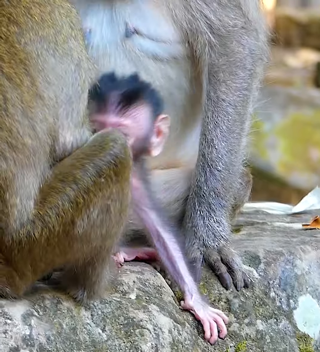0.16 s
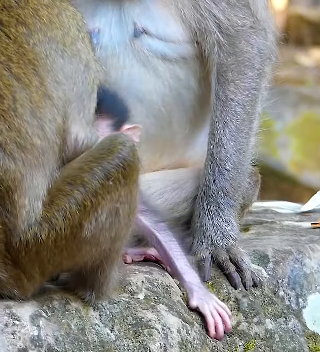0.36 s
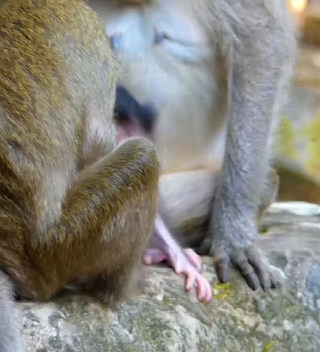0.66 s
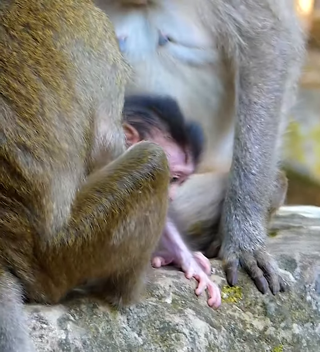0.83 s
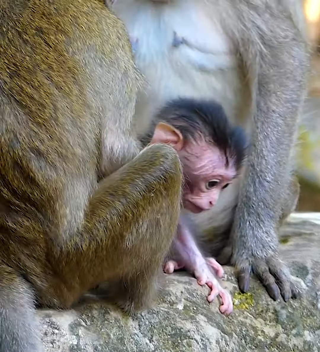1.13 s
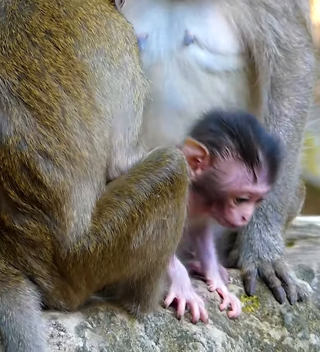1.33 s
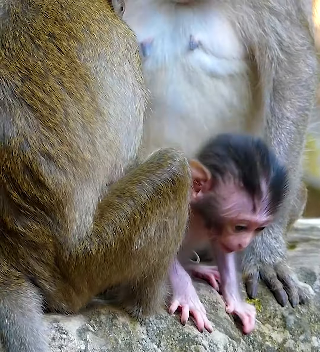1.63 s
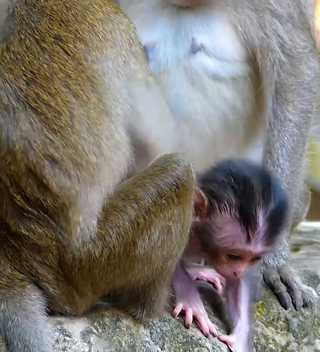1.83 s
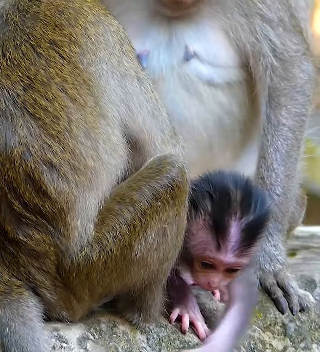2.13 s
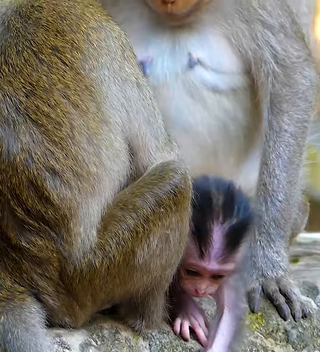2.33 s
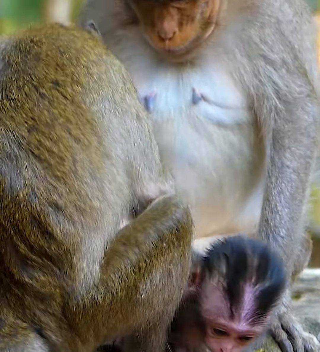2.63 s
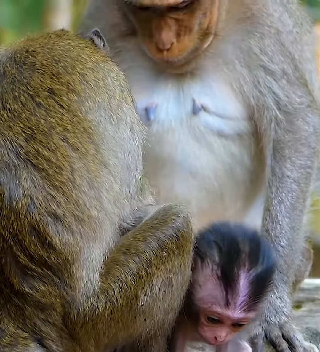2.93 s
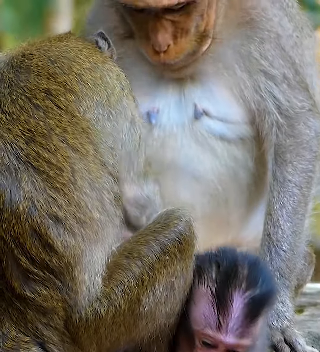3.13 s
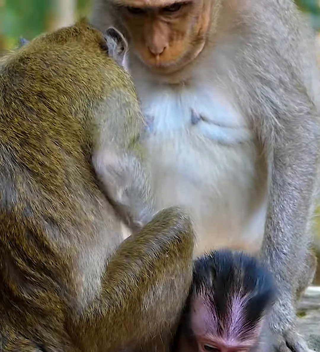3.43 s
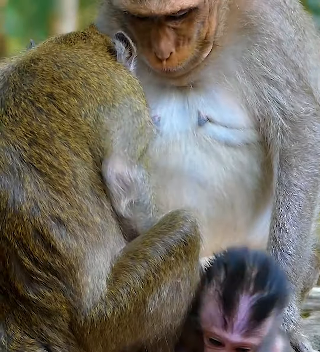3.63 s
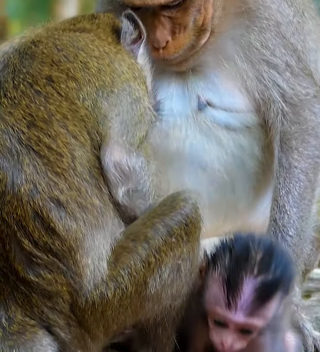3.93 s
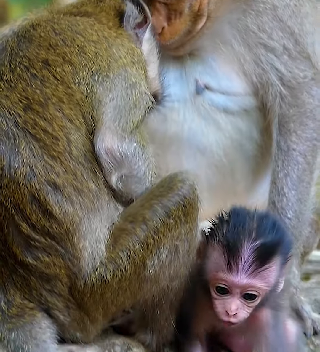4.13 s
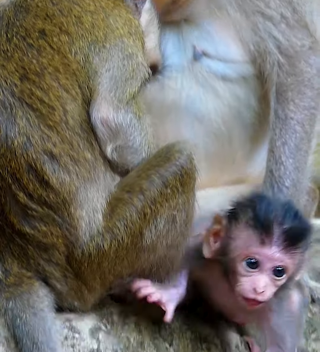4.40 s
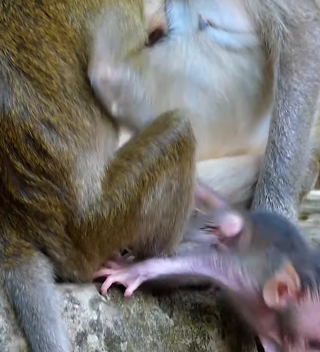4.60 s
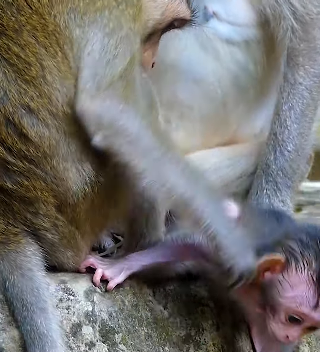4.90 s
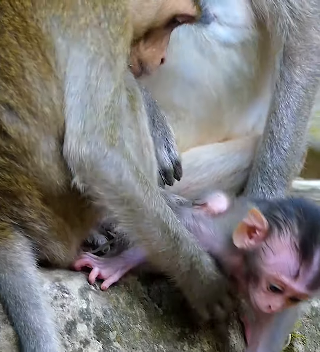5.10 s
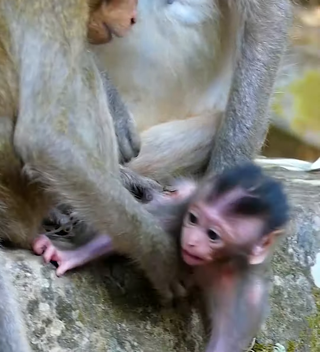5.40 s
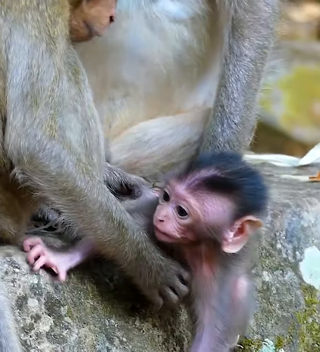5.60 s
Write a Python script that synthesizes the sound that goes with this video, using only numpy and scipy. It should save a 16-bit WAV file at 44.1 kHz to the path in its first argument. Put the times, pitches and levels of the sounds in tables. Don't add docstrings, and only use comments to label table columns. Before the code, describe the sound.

Loud insect buzzing outdoors turns from gritty rasp to clear swelling high tones over soft taps, rustles and a distant engine hum.

```python
import sys
import numpy as np
from scipy import signal
from scipy.fft import rfft, irfft, next_fast_len
from scipy.io import wavfile
from scipy.ndimage import uniform_filter1d, map_coordinates

SR = 44100
rng = np.random.default_rng(int(sys.argv[2]) if len(sys.argv) > 2 else 0)


def unload_audio(sound):
    columns = np.transpose(np.atleast_2d(sound))
    steps = np.round(np.clip(columns, -1, 1) * 32767)
    wavfile.write(sys.argv[1], SR, steps.astype(np.int16))


def ratio_of_db(decibels):
    return 10 ** (np.asarray(decibels, float) / 20)


N = 253575

# time_s, steady_share (0-1), rate_wander_hz, rate_sag_hz
STEADINESS = [
    (0, .3, 4, -3),
    (2.8, .33, 3.2, -3),
    (3.1, .6, 1.2, -1),
    (3.52, .62, 1, -.7),
    (3.6, .93, .75, 0),
    (4, .98, .62, 0),
]
# time_s, level_db, brightness_db (second band over first)
EFFORT = [(0.0, -33.5, 0.5), (0.45, -31.5, -1), (0.9, -33.5, 1.5), (1.4, -31.5, 1.0), (2.0, -31.5, 0),
          (2.6, -31, 0.0), (3.15, -33.5, 1.5), (3.55, -31.5, 0.5), (3.78, -33.5, -0.5), (4.0, -28.0, 0.5),
          (4.3, -30.5, -4.5), (4.65, -29.0, 2.5), (4.95, -31, 1), (5.23, -28.5, 4.5), (5.5, -28.5, -0.5),
          (5.75, -27, 4.5)]
# time_s, clicks_per_s
PACE = [(3.55, 271.6), (3.9, 273.3), (4.45, 275), (5.75, 275.4)]
# pitch_hz, density_db (per Hz)
LOW_BAND = [(1260, -96), (2150, -35), (2520, -5), (2580, -8), (2640, 4.5), (2760, 2), (2850, -9),
            (3000, -18), (3320, -29), (3500, -24.5), (4550, -73), (7700, -120)]
MID_BAND = [(2760, -68), (4700, -40.5), (4960, 1), (5270, 13), (5530, 7.5), (5700, 6), (5840, -20),
            (5960, -45), (6200, -11), (8060, -66), (13600, -120)]
TOP_BAND = [(4350, -84), (7400, -7), (7870, 2), (8140, 10.5), (8450, -23), (8570, -10), (9190, -14),
            (9670, -17.5), (10700, 2.5), (11300, -32), (11500, -66), (12000, -29), (13300, -20),
            (14500, -29)]
# multiple (of the click rate), level_db (in its band)
STEADY_LINES = [(8, -26), (9, -17.5), (10, 2), (11, -18), (12, -20), (13, -28), (14, -34), (18, -19.5),
                (19, -13.5), (20, 0), (21, -16), (22, -16.5), (25, -32), (28, -3.5), (29, -4), (30, 6),
                (31, 3.5), (32, -6.5), (33, -8), (34, -24), (37, -19), (38, -10), (39, -5), (40, -2),
                (41, -45), (42, -36), (45, -15), (49, -12)]
# middle_s, half_length_s, lift_db
SWELLS = [
    (3.288, 0.021, 18),
    (3.81, 0.035, 16.5),
    (4.378, .03, 15),
    (4.946, 0.039, 14.5),
    (5.486, 0.034, 12.5),
]
# multiple (of the click rate), level_db
FLARE_LINES = [(29, -2), (30, -3), (31, 0), (32, -3), (33, -6), (34, -9), (37, -13), (38, -11), (39, -6),
               (40, -7), (41, -10), (42, -11), (43, -13), (45, -15)]
# middle_s, depth_db
CATCHES = [(0.1, 3.5), (0.249, 3.5), (0.375, 12), (0.533, 5), (0.68, 2), (0.819, 20), (0.978, 4), (1.1, 5),
           (1.257, 12.5), (1.445, 7.5), (1.576, 4.5), (1.626, 3.5), (1.678, 6.5), (1.818, 12), (1.997, 6),
           (2.107, 4.5), (2.223, 4.5), (2.351, 7.5), (2.484, 9), (2.642, 3.5), (2.752, 4), (2.881, 5.5),
           (3.007, 4.5), (3.247, 2.5), (3.42, 4), (3.552, 3.5)]
# middle_s, first_band_depth_db, second_band_depth_db
FADES = [(3.626, -1.5, 4), (3.652, 3, -0.5), (3.71, 4, 6), (3.785, 0, 7), (3.847, 3.5, 7),
         (3.941, 7.5, -0.5), (3.985, 7, 5), (4.103, 15, 9), (4.24, -2.5, 4), (4.265, 14, -3.5),
         (4.334, 14.5, -3), (4.36, 1, 7), (4.424, 8, 5), (4.564, 11, 11), (4.699, 6.5, 7), (4.745, 7.5, 7),
         (4.805, 9.5, 6.5), (4.923, 7, 17), (4.999, 10, 9), (5.127, 14, 8), (5.19, 4.5, 10), (5.29, 9, 6),
         (5.338, 7.5, 6.5), (5.37, 4, 1), (5.446, 11, 12), (5.534, 19, 17), (5.657, 19, 11), (5.711, 4, 21)]
# middle_s, half_length_s, level_db, centre_hz
BRUSH_STROKES = [(0.639, 0.0041, -35.5, 1300), (1.526, 0.013, -40.5, 135), (2.719, .006, -45, 5516),
                 (2.728, 0.019, -36, 4600), (3.33, 0.023, -51, 180), (3.337, 0.027, -39, 1675),
                 (3.454, 0.071, -47.5, 3000), (3.65, 0.041, -62, 9200), (4.155, .04, -47, 7610),
                 (4.525, 0.066, -44, 5650), (4.6, 0.15, -51.5, 680), (4.7, 0.23, -44.5, 4260),
                 (4.97, 0.037, -52.5, 240), (5.222, .049, -40.5, 4007), (5.301, 0.078, -49.5, 830),
                 (5.312, 0.054, -40, 3650)]
# start_s, peak_db, centre_hz, t60_s
FOOT_TICKS = [(0.064, -33, 2000, 0.025), (0.066, -33, 3600, 0.025), (0.201, -35, 1100, 0.044),
              (0.315, -39, 554, 0.03), (0.435, -33.5, 1750, 0.033), (0.518, -35.5, 958, 0.046),
              (0.633, -30, 520, 0.018), (1.006, -34.5, 856, 0.048), (1.118, -35, 800, 0.022),
              (1.281, -30, 495, 0.019), (1.321, -38, 624, 0.02), (1.523, -29, 400, 0.019),
              (2.13, -34.5, 337, 0.02), (2.308, -35.5, 355, 0.022), (2.719, -31, 1240, 0.023),
              (3.295, -37.5, 1321, 0.02), (3.353, -25, 1900, 0.014), (3.378, -36.5, 1430, 0.049),
              (3.916, -32, 1823, 0.019), (5.182, -31, 1590, 0.02), (5.566, -35, 1073, 0.023)]
# multiple (of its click rate), level_db
FAR_LINES = [(10, -47), (19, -60), (20, -43), (22, -55), (29, -62), (30, -49.5), (32, -59), (40, -58),
             (42, -68), (50, -69)]
# middle_s, half_length_s, level_db, pitch_hz
COO_TONES = [
    (1.17, .05, -60, 870),
    (2.72, .02, -48, 1200),
    (2.72, .016, -51, 1600),
    (4.236, .004, -42, 1550),
    (4.236, .004, -43, 1870),
    (4.65, .04, -55, 420),
    (4.79, .05, -52, 1200),
]
# time_s, firings_per_s, level_db
IDLE = [(0.0, 21.7, -51.5), (0.77, 21.9, -51), (1.23, 19.9, -50.5), (1.63, 22.3, -51.5),
        (2.05, 21.7, -48.5), (4.36, 21.8, -45), (5.64, 22.3, -45.5), (5.75, 23, -45)]
# multiple (of the firing rate), level_db
ENGINE_ORDERS = [(1, -38), (2, -26), (3, -18), (4, -20), (5, -2), (6, 0.5), (7, -7), (8, -13.5), (9, -27),
                 (10, -22.5)]
# pitch_hz, density_db (per Hz)
FOREST_COLOUR = [(25, -32), (50, -21), (90, 2.5), (160, -3), (300, -5), (1000, -11), (2000, -12.5),
                 (4000, -14.5), (7000, -15), (10000, -18.5), (12000, -25.5), (15500, -23.5)]
# pitch_hz, left_right_likeness (-1 to 1)
FOREST_WIDTH = [(40, 0.89), (100, 0.45), (300, -0.46), (700, 0.1), (1500, 0.39), (4000, 0.79),
                (12000, -0.048)]
# time_s, level_db
BREEZE = [(0, -51), (1, -51.5), (2.6, -52.5), (3.5, -51), (4.5, -49.5), (5.75, -49.5)]

CATCH_HALF_S, FADE_HALF_S = 0.014, 0.014
KICK_LAG_S, KICK_HZ, SWING_S, SETTLE_S = 0.07, 2.1, 0.23, 0.2
FLARE_DB, SHIMMER_DB = -58, 2


def unit(x):
    return x / np.sqrt(np.mean(x ** 2) + 1e-20)


def along(points, hz):
    f, v = np.transpose(points)
    return np.interp(np.log(hz + 1), np.log(f + 1), v)


def curves(rows):
    s, *cols = np.transpose(rows)
    return [np.interp(np.arange(N) / SR, s, c) for c in cols]


def wobble(rate):
    knots = rng.standard_normal(int(N * rate / SR) + 4)
    return map_coordinates(knots, [np.arange(N) * rate / SR])


def bump(s, half):
    out = np.zeros(N)
    first, last = max(int((s - 6 * half) * SR), 0), min(int((s + 6 * half) * SR), N)
    out[first:last] = np.exp(-.5 * ((np.arange(first, last) / SR - s) / half) ** 2)
    return out


def filtered(x, response):
    m = next_fast_len(N + SR // 2)
    return irfft(rfft(x, m) * response(np.fft.rfftfreq(m, 1 / SR)), m)[..., :N]


def pair(alike):
    def mid_side(hz):
        turn = np.arccos(np.clip(along(alike, hz), -1, 1)) / 2
        return np.array([np.cos(turn), np.sin(turn)])
    mid, side = filtered(rng.standard_normal((2, N)), mid_side)
    return np.array([mid + side, mid - side])


def stack(rate, partials, spread=2 * np.pi, flutter_db=0):
    turns = 2 * np.pi * np.cumsum(rate) / SR
    total = 0
    for multiple, db in partials:
        level = ratio_of_db(db + (flutter_db and flutter_db * wobble(16)))
        total = total + np.sqrt(2) * level * np.sin(round(multiple) * turns + rng.uniform(0, spread))
    return total


def trees(x, t60, wet_db):
    t = np.arange(SR // 2) / SR
    tail = rng.standard_normal((2, len(t))) * ratio_of_db(-60 * t / t60)
    return x + ratio_of_db(wet_db) * signal.fftconvolve(x[None], tail / np.linalg.norm(tail[0]), axes=1)[:, :N]


def near_cicada():
    low_db, mid_db = band_levels()
    top_db = 0.12 * (low_db + mid_db + 83.5) - 44.5 + 1.7 * wobble(21.83)
    steady, wander, sag = curves(STEADINESS)
    rate = click_rate() + sag + wander * (.5 * wobble(50) + 0.883 * wobble(160))
    clicks = uneven_clicks()
    bands = [(LOW_BAND, low_db, 0, 16), (MID_BAND, mid_db, 16, 27), (TOP_BAND, top_db, 27, 99)]
    song = 0
    for spectrum, db, first, last in bands:
        rasp = unit(filtered(clicks, lambda hz: ratio_of_db(along(spectrum, hz))))
        lines = [line for line in STEADY_LINES if first < line[0] < last]
        tone = top_lines(rate, lines) if first > 20 else body_lines(rate, lines, db)
        song = song + ratio_of_db(db - 0.5) * (np.sqrt(1 - steady) * rasp + np.sqrt(steady) * tone)
    flare = sum(ratio_of_db(FLARE_DB + lift) * bump(s, half * 0.43) for s, half, lift in SWELLS[1:])
    song = song + stack(rate, FLARE_LINES) * flare
    return trees(song, .3, -11.5) * ratio_of_db([[-.65], [.55]])


def uneven_clicks():
    count = int(N / SR * 5 * 270)
    clicks = np.bincount(rng.integers(0, N, count), ratio_of_db(2 * rng.standard_normal(count)), N)
    return clicks * ratio_of_db(.8 * wobble(55))


def top_lines(rate, lines):
    lift = sum(db * bump(s, half) for s, half, db in SWELLS)
    return unit(stack(rate, lines, flutter_db=1.0)) * ratio_of_db(0.7 * lift - 5.5)


def body_lines(rate, lines, db):
    main = [line for line in lines if round(line[0]) % 10 == 0]
    neighbours = [line for line in lines if round(line[0]) % 10]
    calm = ratio_of_db(0.84 * (uniform_filter1d(db, size=SR // 3) - db))
    shimmer = ratio_of_db(SHIMMER_DB * wobble(42))
    return stack(rate, main) * shimmer + calm * stack(rate, neighbours, flutter_db=2.6)


def click_rate():
    since = np.arange(N) / SR - KICK_LAG_S - np.array(SWELLS)[1:, :1]
    after = np.maximum(since, 0)
    onset = np.clip(since / .02 + 1, 0, 1)
    kicks = KICK_HZ * onset * np.cos(2 * np.pi * after / SWING_S) * np.exp(-after / SETTLE_S)
    return curves(PACE)[0] + kicks.sum(0)


def band_levels():
    level_db, bright_db = curves(EFFORT)
    level_db = level_db - sum(db * bump(s, CATCH_HALF_S) for s, db in CATCHES)
    low_fade, mid_fade = sum(np.outer(dbs, bump(s, FADE_HALF_S)) for s, *dbs in FADES)
    return level_db - low_fade, level_db + bright_db - mid_fade


def brushes():
    out, t = np.zeros((2, N + 2 * SR)), np.arange(SR) / SR - .5
    hz = np.fft.rfftfreq(SR, 1 / SR) + 1
    grain = ratio_of_db(2.54 * wobble(150))
    for s, half, db, centre in BRUSH_STROKES:
        mid, side = rng.standard_normal((2, SR))
        colour = np.exp(-(np.log2(hz / centre) / 2.2) ** 2) * (hz > 150) / (1 + (hz / 12500) ** 6)
        grit = irfft(rfft(mid + 0.33 * side * [[1], [-1]]) * colour)
        out[:, round(s * SR):][:, :SR] += ratio_of_db(db) * np.exp(-.5 * (t / half) ** 2) * unit(grit)
    return out[:, SR // 2:][:, :N] * grain


def ticks():
    out, t = np.zeros((2, N + SR)), np.arange(SR // 10) / SR
    hz = np.fft.rfftfreq(len(t), 1 / SR) + 1
    for s, db, centre, t60 in FOOT_TICKS:
        colour = np.exp(-(np.log2(hz / centre) / 1.15) ** 2)
        puff = unit(irfft(rfft(rng.standard_normal((2, len(t)))) * colour))
        puff = 1.08 * puff[0] + .5 * puff * [[0], [1]]
        shape = ratio_of_db(db + 1.5 - 60 * t / t60) * (1 - np.exp(-t / 0.0012))
        out[:, round(s * SR):][:, :len(t)] += shape * puff
    return out[:, :N]


def far_cicada():
    rate = 272.4 + .6 * wobble(25) + 0.792 * wobble(90)
    song = stack(rate, FAR_LINES) * ratio_of_db(0.73 * wobble(7))
    return trees(song, .4, -4) * ratio_of_db([[-.5], [.5]])


def coos():
    total = 0
    for s, half, db, hz in COO_TONES:
        pitch = hz + 0.00564 * hz / half ** .5 * wobble(90)
        total = total + bump(s, half) * stack(pitch, [(1, db)])
    return total


def engine():
    rate, db = curves(IDLE)
    rate = rate + 0.17 * wobble(6)
    hum = sum(stack(rate, [order], spread=1) * ratio_of_db(2.45 * wobble(2.976)) for order in ENGINE_ORDERS)
    return ratio_of_db(db - 0.9) * unit(hum) * ratio_of_db([[.5], [-.5]])


def forest():
    z = signal.stft(pair(FOREST_WIDTH), nperseg=512)[2]
    patches = uniform_filter1d(rng.standard_normal(z.shape[1:]), 6, 0)
    patches = uniform_filter1d(patches, 14, 1)
    hiss = signal.istft(z * ratio_of_db(1.86 * unit(patches)), nperseg=512)[1][:, :N]
    coloured = filtered(hiss, lambda hz: ratio_of_db(along(FOREST_COLOUR, hz)))
    return ratio_of_db(curves(BREEZE)[0] + 8) * unit(coloured)


def scene():
    return near_cicada() + brushes() + ticks() + far_cicada() + coos() + engine() + forest()


def top_cut(x):
    return signal.sosfilt(signal.butter(12, 15680, fs=SR, output="sos"), x)


def record(dry):
    mix = filtered(dry, lambda hz: 1 - .9 * np.exp(-((hz - 7500) / 60) ** 2))
    return top_cut(mix)


dry = scene()
out = record(dry)
unload_audio(out)
```